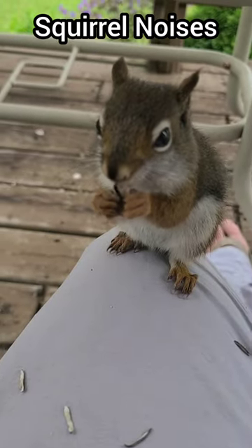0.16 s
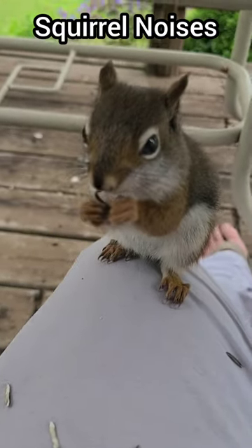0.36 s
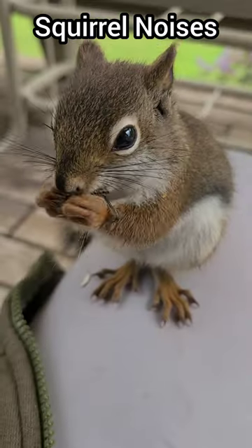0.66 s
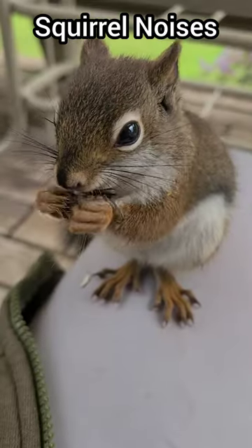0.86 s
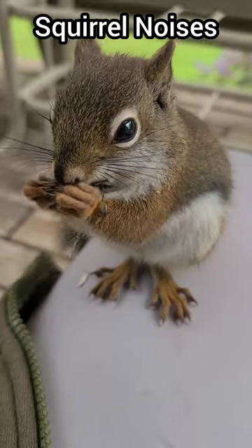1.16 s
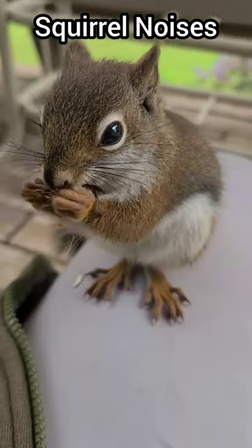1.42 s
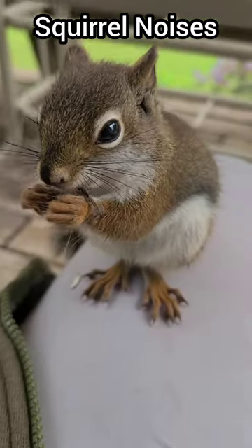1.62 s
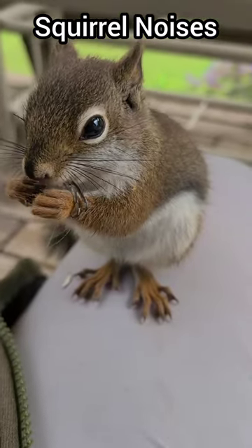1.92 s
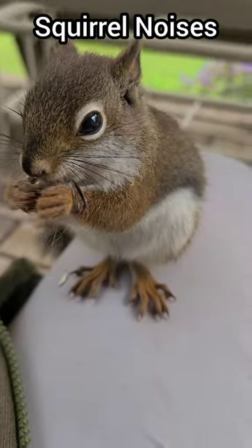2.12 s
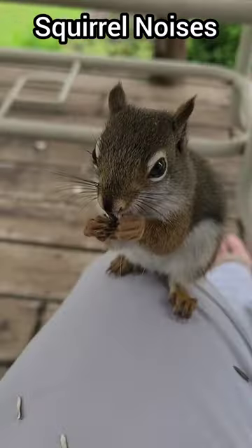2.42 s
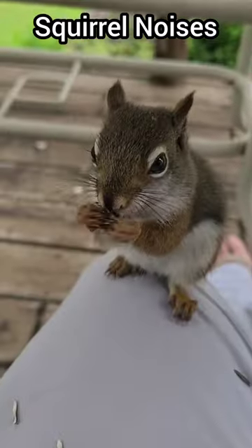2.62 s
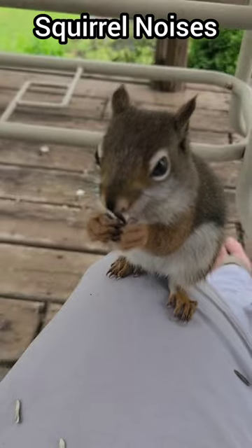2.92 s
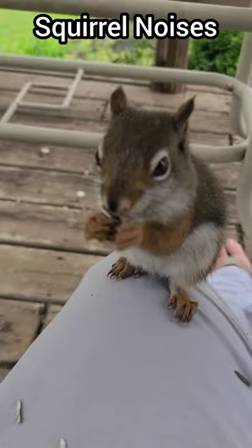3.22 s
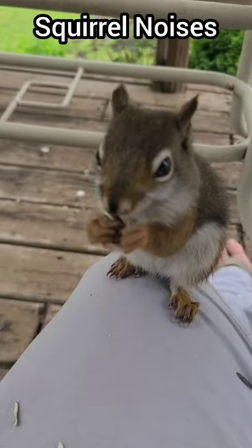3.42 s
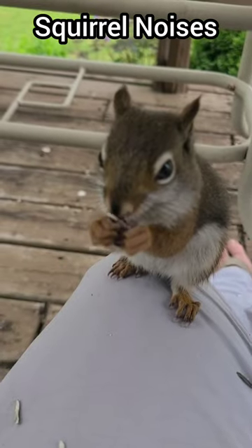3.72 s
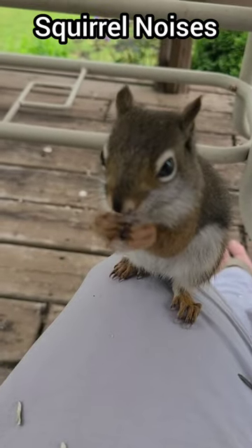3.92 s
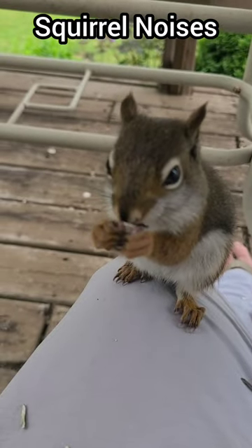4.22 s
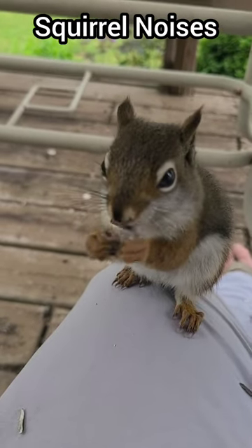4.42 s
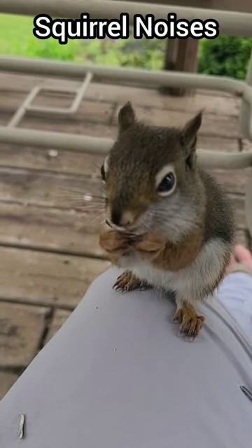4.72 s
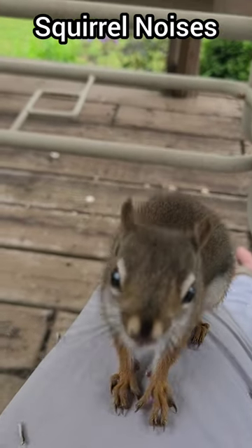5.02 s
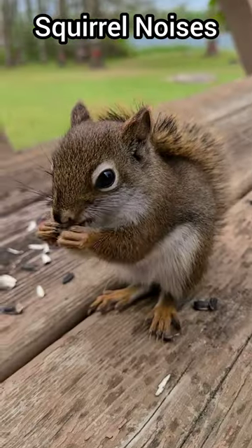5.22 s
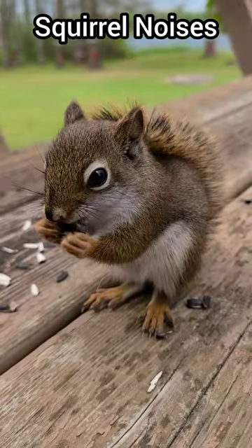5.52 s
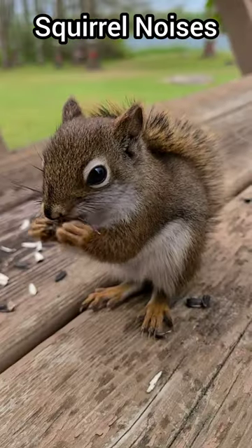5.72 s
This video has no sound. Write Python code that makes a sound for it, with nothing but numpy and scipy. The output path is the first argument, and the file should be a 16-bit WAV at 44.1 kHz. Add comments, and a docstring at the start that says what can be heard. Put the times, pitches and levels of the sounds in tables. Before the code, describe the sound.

Short, creaky squirrel squeaks and crisp nibbling outdoors, over distant birdsong and wind buffeting that grows stronger.

```python
"""Squirrel at close range

Outdoors, a squirrel close to a phone cracks seed husks and squeaks in short notes that break into creak
when its vocal folds skip. Birds whistle and buzz in the trees, over leaf hiss and far rumble. Wind
buffets the two microphone ports; there are dull taps on the phone and a bright rustle. The phone is
held in four places in turn, and two sharp edit clicks mark one cut between shots."""
import sys
import numpy as np
from scipy import signal
from scipy.fft import rfft, irfft, next_fast_len
from scipy.io import wavfile
from scipy.ndimage import uniform_filter1d

SR = 44100
rng = np.random.default_rng(int(sys.argv[2]) if len(sys.argv) > 2 else 0)


def materialize(psi):
    """Save the field psi as 16-bit PCM at rate SR to the path in sys.argv[1].

    A 1-D psi becomes a single channel; in a 2-D psi each row is a channel.
    """
    bounded = np.clip(np.atleast_2d(psi).T, -1, 1)
    quanta = np.round(bounded * 32767).astype(np.int16)
    wavfile.write(sys.argv[1], SR, quanta)


N = 258426

# Where the phone is held, and how the squirrel sounds from there; pan is left minus right:
# (from [s], fundamental pan [dB], low overtone pan [dB], left lead [ms], low overtone gain [dB],
# treble pan, also of birds and air [dB], gain above 6500 Hz [dB])
PLACES = [(0, 3.5, -6, 0.23, 7.5, 5, -1), (0.677, -6, 5, 0.23, -6, 4.5, 7), (2.31, 4, -5.5, 0.2, 8, 6, 0),
          (5.188, 1.2, -4.5, 0.15, 9.5, -1.5, -20)]
# Edit clicks at a cut between shots; the first chops a squeak off: (time [s], peak [dB])
EDIT_CLICKS = [(2.3077, -24), (2.328, -26)]


def gain_of(db):
    """Decibels to a factor."""
    return 10 ** (np.asarray(db) / 20)


def unit_rms(x):
    """Scales to rms 1."""
    return x / np.sqrt(np.mean(x ** 2) + 1e-20)


def read(points, hz):
    """Reads a spectrum on a log-frequency axis."""
    f, value = np.transpose(points)
    return np.interp(np.log(hz + 1), np.log(f + 1), value)


def add(mix, s, sound):
    """Adds a sound to the mix at s seconds."""
    part = mix[:, max(round(s * SR), 0):][:, :sound.shape[1]]
    part += sound[:, :part.shape[1]]


def sides(db):
    """Gains of left and right for a level difference."""
    return gain_of(np.array([db / 2, -db / 2]))


def spread(rows):
    """Times and columns of a curve table, sample by sample."""
    s, *columns = np.transpose(rows)
    t = np.arange(s[0], s[-1], 1 / SR)
    return t, [np.interp(t, s, c) for c in columns]


def coloured(x, points):
    """Filters by a spectrum of (Hz, dB) points and scales to rms 1."""
    size = next_fast_len(x.shape[-1])
    gain = gain_of(read(points, np.fft.rfftfreq(size, 1 / SR)))
    return unit_rms(irfft(rfft(x, size) * gain, size)[..., :x.shape[-1]])


def drift(seconds, channels=1):
    """Random wander of rms 1, smoothed over the given time."""
    width = max(round(seconds * SR), 1)
    return unit_rms(uniform_filter1d(uniform_filter1d(rng.standard_normal((channels, N)), width), width))


def glide(start, length, db, change_db, first_hz, turn, turn_hz, last_hz):
    """Times, level and pitch of a note that bends once."""
    u = np.arange(0, length, 1 / SR) / length
    hz = np.interp(u, [0, np.clip(turn, 0, 1), 1], [first_hz, turn_hz, last_hz])
    return start + u * length, db + change_db * (u - .5), hz


def place_at(t):
    """Index of the microphone's place at time t."""
    return np.searchsorted([place[0] for place in PLACES], t, "right") - 1


def treble_sides(t):
    """Left and right gains for high sounds at time t."""
    return sides(np.array(PLACES)[place_at(t), 5])


def air():
    """Leaf hiss and far rumble in drifting patches; the bass is nearly the same at both ports."""
    # Background spectrum, one list a place: (frequency [Hz], relative level [dB])
    colours = [
        [(90, -26), (150, -1), (400, -5), (1600, -18), (6300, -26), (7600, -34), (16000, -40)],
        [(90, -34), (150, 2), (900, -9), (3500, -20), (11500, -35.5), (16000, -34)],
        [(90, -67), (150, -9), (500, -11.5), (900, -19), (3000, -27), (8000, -39), (16000, -46.5)],
        [(15, -30), (30, 13.5), (80, 17.5), (120, -52), (170, -14), (900, -19), (8000, -33.5), (16000, -42.5)],
    ]
    # Background strength, one a place: (level [dB])
    levels = [-54.5, -51.5, -55, -41.5]
    frames, hz = N // 256 + 5, np.fft.rfftfreq(1024, 1 / SR)
    a, b, c, d, patches = rng.standard_normal((frames, 513, 5)).T
    patches = unit_rms(uniform_filter1d(uniform_filter1d(patches, 12, 0), 12, 1))
    coherence = read([(150, .98), (700, .32), (1400, -.29), (3500, .041), (8000, -.055)], hz)[:, None]
    left = a + 1j * b
    right = coherence * left + np.sqrt(1 - coherence ** 2) * (c + 1j * d)
    spectra = np.array([left, right]) * gain_of(1.8 * patches)
    out, starts = np.zeros((2, N)), [round(p[0] * SR) for p in PLACES] + [N]
    for colour, db, place, start, end in zip(colours, levels, PLACES, starts, starts[1:]):
        pan_db = place[5] * read([(1500, 0), (7000, 1)], hz)
        shape = sides(pan_db) * gain_of(read(colour, hz))
        hiss = signal.istft(spectra * shape[..., None], nperseg=1024, noverlap=768)[1]
        here = uniform_filter1d(1. * (np.arange(N) >= start) * (np.arange(N) < end), 300)
        out += gain_of(db) * here * hiss[:, :N] / hiss[:, start:end].std()
    return out


def birds():
    """Birds off in the trees: wavering whistles and a buzz of quick upward sweeps, blurred by echoes."""
    # Whistled notes: (start [s], length [s], mid level [dB], level change [dB], first pitch [Hz],
    # turn [share of length], pitch at turn [Hz], last pitch [Hz])
    whistles = [(1.006, 0.18, -48, -4, 3380, 0.61, 4950, 3270),
                (5.593, 0.047, -52, -6, 3296, 0.36, 3350, 2606),
                (5.632, 0.055, -47.5, -10, 2592, 0.5, 3636, 2756),
                (5.713, 0.066, -57.5, -24, 2890, 0.43, 2830, 2070),
                (5.8, 0.064, -47, 20, 2270, 0.4, 2930, 3780),
                (0.105, 0.15, -71, -12, 6450, 0.9, 5550, 4800),
                (0.26, 0.11, -63, -1, 6950, 0.5, 6120, 5350),
                (0.403, 0.15, -65.5, -6, 7100, 0.6, 6160, 5007),
                (0.554, 0.086, -64, 0.5, 6970, 0.75, 7060, 7580),
                (2.311, 0.11, -64, -1, 7294, 0.32, 7300, 7000),
                (2.37, 0.068, -64, 14, 4700, 0.64, 6290, 5770)]
    # Course of the buzz: (time [s], level [dB], centre pitch [Hz])
    buzz_curve = [(1.237, -49.5, 3507), (1.3, -48.5, 4003), (1.36, -47.5, 4100), (1.44, -52, 3615),
                  (1.47, -90, 3590)]
    sweeps_per_s, sweep_hz, reverb_s = 78, 450, .4
    calls, waver = np.zeros((1, N)), drift(.0041, channels=2)
    for note in whistles:
        t, db, hz = glide(*note)
        wobble, flutter = waver[:, round(t[0] * SR):][:, :len(t)]
        n = len(wobble)
        hz = uniform_filter1d(hz, len(t) // 3)[:n] * (1 + .014 * wobble)  # the bend is rounded
        tone = np.sin(2 * np.pi * np.cumsum(hz) / SR) * signal.windows.tukey(n, .3)
        if note[2] <= -60:  # far notes arrive as a fuzzy band
            tone *= drift(.002)[0, :n]
        add(calls, t[0], (gain_of(db[:n] + 3.5 * flutter) * tone)[None])
    t, (db, hz) = spread(buzz_curve)
    beat = (t * sweeps_per_s + .45 * drift(.015)[0, :len(t)]) % 1
    phase = 2 * np.pi * np.cumsum(hz + sweep_hz * (beat - .5)) / SR
    buzz = (.42 + np.sin(np.pi * beat)) * (np.sin(phase) + gain_of(-7.5) * np.sin(1.196 * phase))
    add(calls, t[0], (gain_of(db) * buzz)[None])
    lag = np.arange(SR // 2) / SR
    trees = rng.standard_normal((2, len(lag))) * gain_of(-60 * lag / reverb_s) * (lag > .01)
    trees /= np.linalg.norm(trees[0])
    echoes = signal.fftconvolve(calls, trees, axes=1)[:, :N]
    direct = np.array([calls[0], np.roll(calls[0], 2)])  # the left port is nearer the trees
    return treble_sides(np.arange(N) / SR) * (direct + gain_of(-4) * echoes)


def wind():
    """Lumpy low turbulence on the microphone, unrelated at the two ports; hard gusts reach higher."""
    # Steady wind: (time [s], level [dB])
    breeze = [(0.0, -43.5), (1.97, -39), (2.44, -44.5), (2.96, -37), (3.68, -38.5), (4.12, -46.5),
              (4.37, -32.5), (5.19, -33)]
    # Gusts: (time [s], level at the left port [dB], at the right port [dB])
    gusts = [(0.56, -62, -34.5), (0.762, -32.5, -69), (1.673, -28, -38.5), (2.021, -42, -34),
             (2.469, -32, -38), (3.423, -29.5, -32.5), (3.599, -42, -30), (3.69, -29.5, -59),
             (3.83, -27, -38), (4.179, -27.5, -39), (4.292, -26, -26.5), (4.492, -22, -21),
             (4.762, -19.5, -20.5), (5.03, -25.5, -21.5), (5.179, -27, -25.5)]
    # Spectrum of the buffeting: (frequency [Hz], relative level [dB])
    buffet_colour = [(15, -56), (38, 7), (87, 7), (148, -26.5), (274, -39), (500, -75), (1100, -120)]
    roar_colour = [(50, 8.5), (120, 13.5), (200, -3.5), (350, -18), (2000, -110)]
    gust_s = .033
    t, (steady_db,) = spread(breeze)
    gust_power = sum(gain_of(2 * np.c_[db]) * np.exp(-((t - s) / gust_s) ** 2) for s, *db in gusts)
    db = 10 * np.log10(gain_of(2 * steady_db) + gust_power)
    lumps = gain_of(2.5 * drift(.015, channels=2))
    buffet = unit_rms(coloured(rng.standard_normal((2, N)), buffet_colour) * lumps)
    roar = unit_rms(coloured(rng.standard_normal((2, N)), roar_colour) * lumps)
    pressure = gain_of(db) * buffet[:, :len(t)] + gain_of(1.7 * db + 14) * roar[:, :len(t)]
    out = np.zeros((2, N))
    add(out, t[0], pressure * signal.windows.tukey(len(t), .006))
    return out


def rustle():
    """A dry, bright rustle to the right: dense tiny ticks of very unequal size."""
    # Course of the rustle: (time [s], level [dB])
    swell = [(5.315, -69), (5.33, -40), (5.35, -69), (5.372, -35.5), (5.41, -37), (5.45, -40), (5.47, -58),
             (5.6, -72)]
    # Its spectrum: (frequency [Hz], relative level [dB])
    colour = [(1500, -18), (3000, -13), (6000, -6.5), (10000, -7.5), (15000, 2)]
    ticks_per_s, decay_s = 2500, .0016
    out = np.zeros((2, N))
    t, (db,) = spread(swell)
    sizes = gain_of(4.95 * np.minimum(rng.exponential(1, len(t)), 5))
    impulses = sizes * (rng.random(len(t)) < ticks_per_s / SR)
    bursts = .35 + signal.lfilter([1], [1, -np.exp(-1 / (decay_s * SR))], impulses)
    noise = rng.standard_normal((2, len(t)))
    crackle = coloured(bursts * (noise + .048 * noise[::-1]), colour)
    add(out, t[0], gain_of(db) * sides(-6.5)[:, None] * crackle)
    return out


def taps():
    """Dull taps on the phone itself: two heavily damped modes each."""
    # Knocks on the case: (time [s], level [dB], pitch [Hz])
    knocks = [(0.66, -34, 257), (1.609, -35, 382), (1.625, -26.5, 330), (1.692, -34, 250),
              (1.791, -34, 360), (1.886, -30.5, 348), (2.673, -32, 268.4), (5.096, -34, 573),
              (5.584, -38.5, 603)]
    out, t = np.zeros((2, N)), np.arange(900) / SR
    for s, db, hz in knocks:
        phase = 2 * np.pi * hz * t
        knock = (np.sin(phase) + .5 * np.sin(1.93 * phase)) * np.exp(-t / .0014)
        add(out, s, gain_of(db) * np.array([knock, np.roll(knock, 8)]))
    return out


def edit_clicks():
    """Sharp clicks at a cut between shots: one jump in the signal each, alike in both channels."""
    out, jump = np.zeros((2, N)), np.exp(-np.arange(60) / 7.9)
    for s, db in EDIT_CLICKS:
        add(out, s, gain_of(db) * np.array([jump, jump]))
    return out


def nibbling():
    """Teeth on seed husk, close up: cracks ring its broad modes and crumble on, over a faint patter."""
    # Bites: (time [s], level [dB], body [dB]); with body above zero the lowest mode rings out,
    # below zero the ring fades and leaves a thinner, higher crumble
    bites = [(0.401, -51, 8), (0.421, -59, 18), (0.615, -31, -26), (0.653, -49.5, 10), (1.1338, -48, 12),
             (2.5701, -45, 8), (3.665, -49.5, 13), (3.695, -53, 13), (5.4964, -44, -1.5), (1.056, -32, -30),
             (1.081, -46, 5), (1.2656, -41, -27), (1.9047, -54.5, 15), (2.5426, -44, 3), (2.6759, -44, 6.5),
             (2.805, -38.5, 5), (3.823, -56, 9), (4.5156, -50.5, 12), (4.6632, -38, -16),
             (4.705, -41.5, -25), (4.835, -51, -2), (4.852, -46, -23), (4.938, -58, 15.5),
             (4.9484, -52, 14), (4.965, -44.5, 2), (4.981, -49, -8), (5.5279, -34, -27.5),
             (5.6068, -44, 7.5), (5.6556, -42.5, 10)]
    # Modes of the husk: (frequency [Hz], bandwidth [Hz], level [dB])
    husk_modes = [(2900, 1500, 5), (6400, 1800, 1), (11500, 3500, -24)]
    out, t = np.zeros((2, N)), np.arange(500) / SR
    patter = rng.random((140, 3)) * [N / SR, 9, -14] + [0, -68, 0]
    parents = np.repeat(bites, 3, axis=0)  # three weaker splinters crowd round each bite
    splinters = parents + rng.random(parents.shape) * [.02, -10, -20] - [.005, 8, 0]
    cracks = np.r_[bites, splinters, patter]
    tunings = 1 + .017 * rng.uniform(-.89, 1, len(cracks))
    for (s, db, body_db), tuning in zip(cracks, tunings):
        ring = 0
        for k, (hz, width_hz, mode_db) in enumerate(husk_modes):
            strength = gain_of(mode_db + (body_db if k == 0 else min(body_db, 0)))
            ring += strength * np.exp(-np.pi * width_hz * t) * np.sin(2 * np.pi * hz * tuning * t)
        ring *= 1 - np.exp(-t / .000087)
        noise = rng.standard_normal((2, len(t)))
        coarse = signal.lfilter([1, 1, -1, -1], [1], noise)
        fine = signal.lfilter(np.poly(np.ones(5)), [8], noise)  # steep high-pass
        thin = np.clip(-body_db / 25, 0, 1)
        crumble = .25 * ((1 - thin) * coarse + thin * fine) * np.exp(-t / .002) * np.minimum(t / .0015, 1)
        crack = np.array([ring, np.roll(ring, 8)]) + crumble
        add(out, s, gain_of(db + 6) * treble_sides(s)[:, None] * crack)
    return out


def phrase():
    """The squirrel's effort, pitch and time since its last pause; where notes meet the stronger holds."""
    # Short squeaks: (start [s], length [s], attack [s], mid effort [dB], effort change [dB],
    # first pitch [Hz], turn [share of length], pitch at turn [Hz], last pitch [Hz])
    squeaks = [(-0.01, 0.11, 0.004, -32.5, -4.5, 645, 0.83, 692, 540),
               (0.253, 0.052, 0.0098, -34, -8.5, 846, 0.43, 854, 674),
               (0.302, 0.036, 0.0059, -35, -19, 744, 0.35, 795, 580),
               (0.336, 0.038, 0.01, -37.5, -14, 904, 0.32, 940, 710),
               (0.539, 0.097, 0.018, -32.5, -12, 680.4, 0.38, 690, 488.3),
               (0.631, 0.026, 0.018, -31.5, -3, 501, 0.36, 608, 627),
               (0.924, 0.046, 0.015, -35.5, -24, 893, 0.27, 683, 578),
               (1.387, 0.043, 0.013, -31, 4, 772, 0.61, 752, 792),
               (1.434, 0.102, 0.009, -33, -7, 748, 0.7, 750, 590),
               (1.949, 0.035, 0.011, -43.5, -8, 695, 0.55, 688, 612),
               (1.975, 0.065, 0.013, -35.5, -19, 735, 0.6, 629, 619),
               (2.028, 0.029, 0.011, -41, -11, 623, 0.55, 680, 594),
               (2.289, 0.027, 0.0054, -24.5, 4.5, 715, 0.42, 692, 698),
               (2.314, 0.029, 0.003, -35.5, -4, 611, 0.4, 646, 656),
               (2.481, 0.04, 0.0088, -32, -3, 813, 0.75, 723, 725),
               (2.521, 0.077, 0.0022, -35, -6.5, 721, 0.41, 809, 556),
               (2.71, 0.038, 0.0039, -30.5, 0.5, 816, 0.3, 607, 545.4),
               (2.736, 0.083, 0.0057, -32, -9.5, 661, 0.5, 558, 570),
               (3.2, 0.057, 0.0096, -30, 0, 768, 0.22, 620.4, 578.4),
               (3.488, 0.075, 0.0078, -29, 4, 683, 0.23, 597.5, 713),
               (3.557, 0.037, 0.0078, -32.5, 10, 835, 0.5, 611, 654),
               (3.593, 0.038, 0.004, -38.5, -22.5, 755, 0.48, 840, 837),
               (3.631, 0.034, 0.008, -38, -8, 888, 0.43, 726, 646),
               (4.011, 0.086, 0.017, -37, -1, 503, 0.63, 657, 552),
               (4.313, 0.061, 0.011, -41.5, -12, 829, 0.5, 686, 642),
               (4.365, 0.077, 0.025, -34.5, -1.5, 661, 0.77, 540.6, 618),
               (4.641, 0.042, 0.005, -31.5, -5.5, 826, 0.7, 770, 1171),
               (4.812, 0.033, 0.0056, -38.5, -8.5, 707, 0.29, 795, 671),
               (4.856, 0.046, 0.013, -32, 3, 601, 0.47, 705, 541),
               (4.902, 0.031, 0.0071, -36.5, -3, 545, 0.61, 744, 659),
               (5.268, 0.067, 0.025, -33.5, 12, 525, 0.6, 581.6, 545.4),
               (5.315, 0.036, 0.0057, -31.5, -4, 380, 0.5, 367.6, 368.7),
               (5.352, 0.047, 0.0085, -31, 1, 628.5, 0.3, 413.6, 432.4),
               (5.455, 0.03, 0.0034, -32.5, 5, 517, 0.35, 552, 450),
               (5.636, 0.017, 0.0043, -30, -5, 568.5, 0.33, 614, 535),
               (5.675, 0.041, 0.0045, -34.5, 5, 679, 0.55, 712, 648),
               (5.711, 0.035, 0.0083, -32.5, -5.5, 458, 0.56, 597, 570)]
    # Squeals that bend several times, one list each: (time [s], effort [dB], pitch [Hz])
    squeals = [
        [(0.69, -57, 838), (0.705, -33.5, 862), (0.726, -35.5, 877.6), (0.748, -29.5, 775.6), (0.772, -33, 808),
         (0.795, -28.5, 730), (0.86, -31, 765.5), (0.894, -30, 675), (0.91, -33, 760), (0.922, -43.5, 973)],
        [(1.174, -42.5, 789), (1.188, -30, 766), (1.205, -29.5, 656), (1.24, -30, 662), (1.262, -32.5, 775),
         (1.286, -46, 707)],
        [(2.966, -39, 719), (2.976, -35, 733), (3.004, -31, 754), (3.02, -35.5, 576.5), (3.036, -33, 601.5),
         (3.054, -61, 572.4)],
        [(3.258, -33, 532), (3.274, -30, 639), (3.286, -32.5, 728), (3.3, -32, 636), (3.312, -31, 763),
         (3.326, -34.5, 801), (3.342, -52, 882)],
        [(3.842, -61, 1148), (3.851, -34, 1126), (3.872, -33.5, 983), (3.9, -29.5, 917), (3.912, -37.5, 796),
         (3.933, -32.5, 642), (3.96, -33, 623), (3.995, -37.5, 612), (4.01, -43, 519)],
        [(5.388, -45, 596.5), (5.396, -28.5, 597), (5.408, -28.5, 654.5), (5.417, -29.5, 646.5),
         (5.425, -32, 540), (5.436, -30, 705), (5.448, -33, 521), (5.456, -42, 441)],
    ]
    release_s, cut_s = .0094, EDIT_CLICKS[0][0]
    effort, hz = np.zeros(N), np.full(N, 600.)
    notes = [(t, gain_of(db), pitch) for t, (db, pitch) in map(spread, squeals)]
    for start, length, attack, *shape in squeaks:
        t, db, pitch = glide(start, length, *shape)
        edge = np.clip(np.minimum((t - t[0]) / attack, (t[-1] - t) / release_s), 0, 1)
        edge *= (t < cut_s) | (start > cut_s)
        notes.append((t, gain_of(db) * np.sin(np.pi / 2 * edge) ** 2, pitch))
    for t, strength, pitch in notes:
        at = np.round(t * SR).astype(int)
        wins = (at >= 0) & (strength >= effort[at])
        effort[at[wins]], hz[at[wins]] = strength[wins], pitch[wins]
    rested = uniform_filter1d(effort, size=700, origin=349) < 1e-5
    age = (np.arange(N) - np.maximum.accumulate(np.arange(N) * rested)) / SR
    return effort, hz, age


def creaking(t):
    """How far the vocal folds stumble, and how far strong and weak cycles alternate."""
    # Stretches of creak: (from [s], to [s], irregularity [0-1], alternation [0-1])
    stretches = [(.02, .045, .8, .6), (.285, .3, .8, .5), (.549, .572, .8, .6), (2.5, 2.516, .4, .5),
                 (2.714, 2.746, .6, 1), (2.968, 3.0, .85, .8), (3.206, 3.228, .15, .9),
                 (3.228, 3.256, .8, 1), (3.492, 3.53, .15, .8), (3.53, 3.565, .8, 1),
                 (4.645, 4.685, .3, .3), (3.894, 3.916, .3, .5), (5.319, 5.349, .9, .3),
                 (5.362, 5.392, .9, .3), (5.42, 5.456, .25, .2), (5.641, 5.664, .5, .6),
                 (5.678, 5.72, .25, 1)]
    creak, alternation = np.full(N, .015), np.zeros(N)
    for start, end, irregularity, depth in stretches:
        inside = (t > start) & (t < end)
        creak[inside], alternation[inside] = irregularity, depth
    return uniform_filter1d(creak, 80), uniform_filter1d(alternation, 80)


def squirrel():
    """The voice, close up: wavering harmonics shaped by the throat; creak adds tones between them."""
    # Response of the throat: (frequency [Hz], gain [dB])
    throat = [(350, 3), (490, 19), (800, 5), (1300, -5.5), (1650, -7.5), (1950, -15), (2330, -13),
              (2850, -24), (3700, -25.5), (4600, -29.5), (6000, -50), (7500, -41), (9800, -46),
              (13500, -68)]
    # Spectrum of the rasp and of the tones between the harmonics: (frequency [Hz], relative level [dB])
    creak_colour = [(300, -23), (950, -8), (1550, -4), (1960, -20.5), (2330, -15), (2840, -32), (3720, -20),
                    (5400, -43.5)]
    # Quick unevenness of the treble overtones at a pitch of 700 Hz, one a place: (jitter [cycles])
    hoarseness = [.01, .004, .011, .018]
    mouth_nearly_shut = [(.862, .97), (1.38, 1.54), (2.28, 2.31)]  # dulls the treble: (from [s], to [s])
    muffle_db, creak_cost_db = -9, -2
    t = np.arange(N) / SR
    effort, hz, age = phrase()
    creak, alternation = creaking(t)
    effort = uniform_filter1d(effort, 30) * gain_of(creak_cost_db * creak)
    waver, flutter, *shimmer = drift(.00611, channels=6)
    hz = uniform_filter1d(hz, 200) * np.exp(.12 * creak * drift(.0015)[0] + .006 * waver)
    jitter = np.array(hoarseness)[place_at(t)] * (700 / hz) ** 2.5 * drift(.001)[0]  # low is hoarser
    cycles = np.cumsum(hz) / SR
    slips, weakness = rng.random((2, N))
    order = uniform_filter1d((-1.) ** np.cumsum(slips < .0006 * creak), 30)  # strong and weak swap
    cycle_strength = uniform_filter1d(1 - .8 * creak * weakness[np.round(cycles).astype(int)], 16)
    level = effort * cycle_strength * gain_of(.7 * flutter)
    on, out, power = effort > 1e-4, np.zeros((2, N)), 0
    _, pan_db, low_pan_db, lead_ms, low_db, treble_pan_db, top_db = np.array(PLACES)[place_at(t[on])].T
    # Harder and creakier notes are richer in overtones; high, fresh ones carry far into the treble.
    pressed_db = 4 * creak[on] + .5 * np.minimum(20 * np.log10(effort[on]) + 32, 1)
    sheen_db = 3.6 * np.log2(hz[on] / 700) - 46 * age[on] + 5.1
    sheen_db += muffle_db * sum((t[on] > start) & (t[on] < end) for start, end in mouth_nearly_shut)
    fundamental = gain_of(read(throat, hz[on]))
    for k in range(1, 16):
        harmonic_hz = k * hz[on]
        treble = np.clip((harmonic_hz - 1700) / 500, 0, 1)
        lean_db = (1 - treble) * low_pan_db + treble * treble_pan_db if k > 1 else pan_db
        colour_db = pressed_db + (1 - treble) * low_db + treble * sheen_db + (harmonic_hz > 6500) * top_db
        colour_db += 2.2 * shimmer[k % 4][on] - 5 * alternation[on]
        harmonic = gain_of(read(throat, harmonic_hz) + colour_db) if k > 1 else fundamental
        between = fundamental * (alternation * order)[on] * gain_of(read(creak_colour, (k - .5) * hz[on]))
        power += (harmonic ** 2 + between ** 2) / 2
        for port, side in enumerate((.5, -.5)):  # the nearer, left port hears each cycle earlier
            phase = 2 * np.pi * k * (cycles[on] + treble * jitter[on] + side * hz[on] * lead_ms / 1000)
            out[port, on] += harmonic * gain_of(side * lean_db) * np.cos(phase - .46 * k)
            out[port, on] += between * gain_of(side * low_pan_db) * np.cos(phase * (k - .5) / k - .78 * k)
    out[:, on] *= level[on] / np.sqrt(power)
    puffs = 1 + np.cos(2 * np.pi * cycles)  # air escapes with each cycle
    rasp = coloured(rng.standard_normal((2, N)), creak_colour) * puffs
    return out + gain_of(-27 + 9 * creak) * effort * rasp


def scene():
    """All sounds in the two channels."""
    return squirrel() + birds() + nibbling() + edit_clicks() + taps() + rustle() + wind() + air()


def record(dry):
    """The band limit: a steep low-pass."""
    edge_hz = 15950
    return signal.oaconvolve(dry, signal.firwin(511, edge_hz, window=("kaiser", 9), fs=SR)[None], "same")


dry = scene()
out = record(dry)
materialize(out)
```